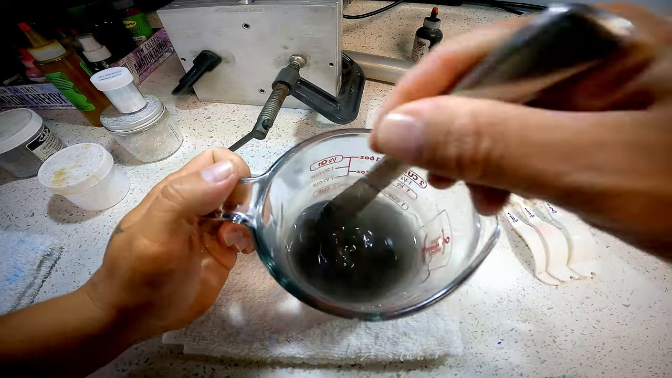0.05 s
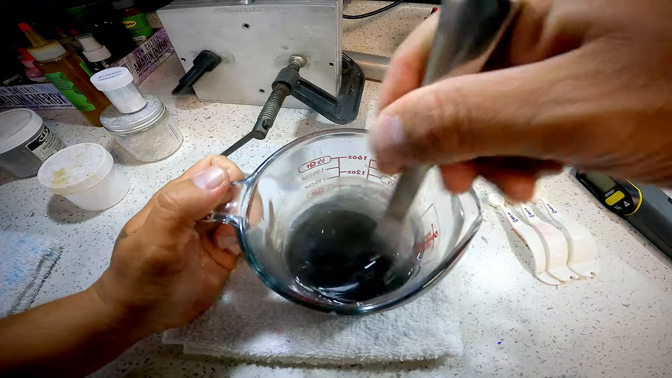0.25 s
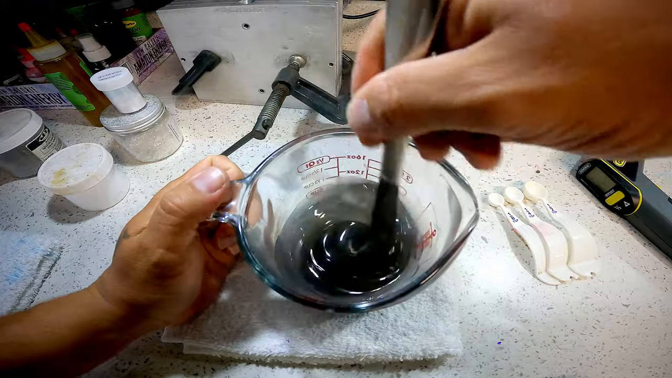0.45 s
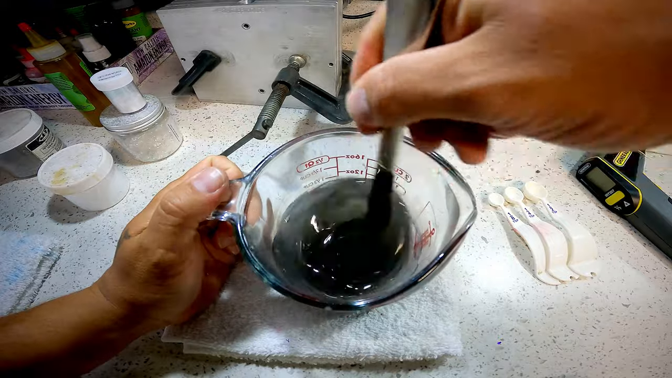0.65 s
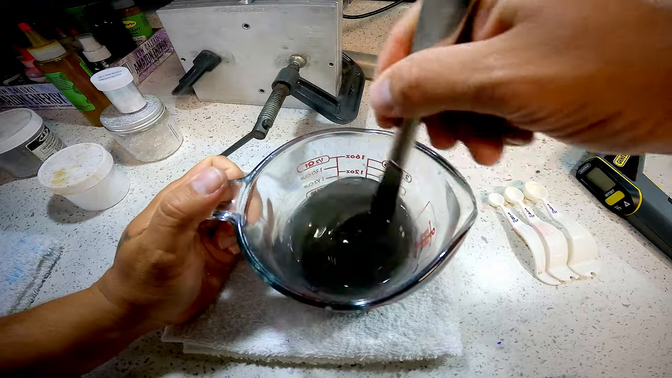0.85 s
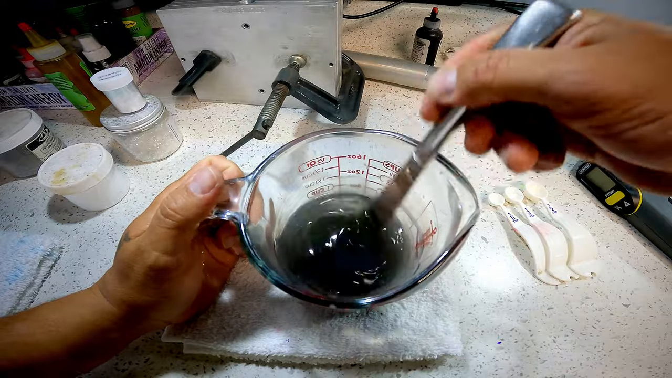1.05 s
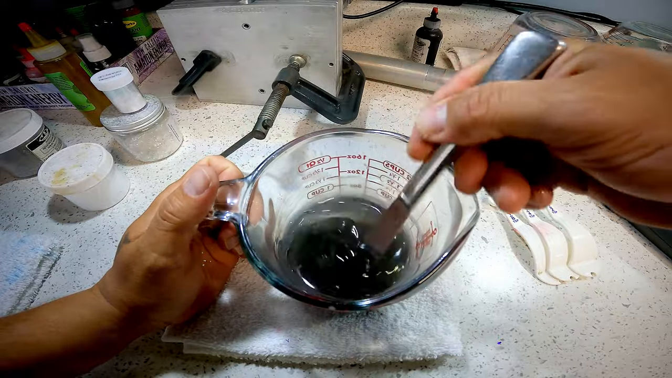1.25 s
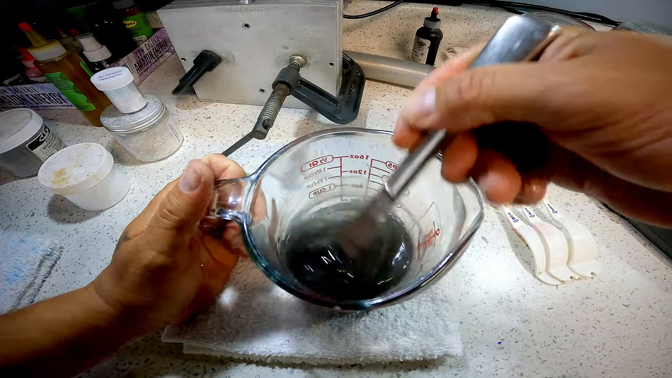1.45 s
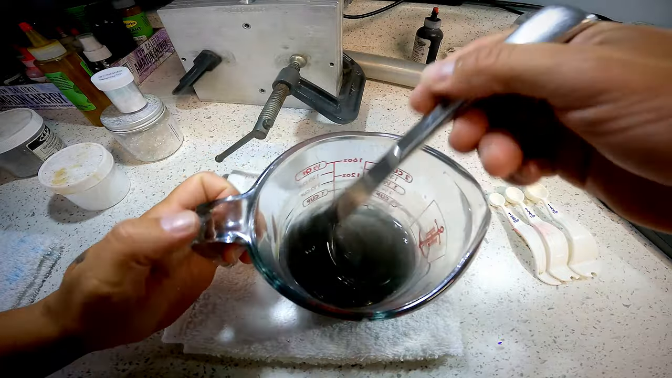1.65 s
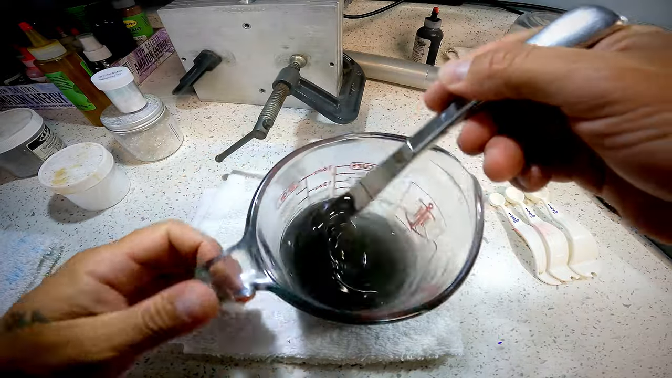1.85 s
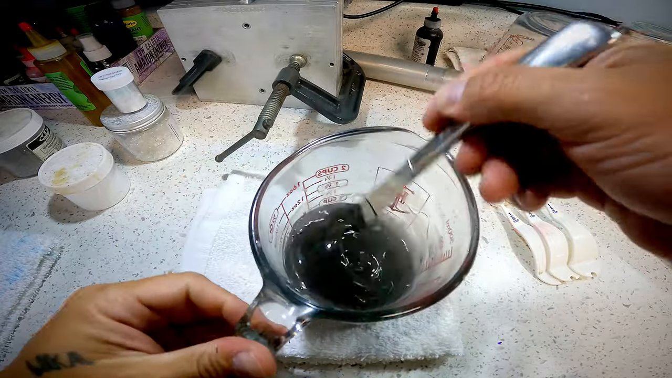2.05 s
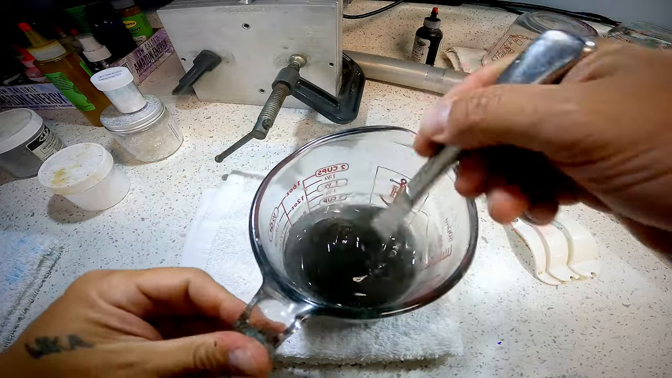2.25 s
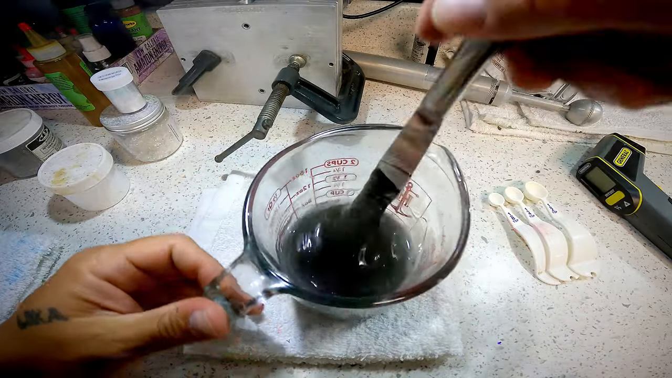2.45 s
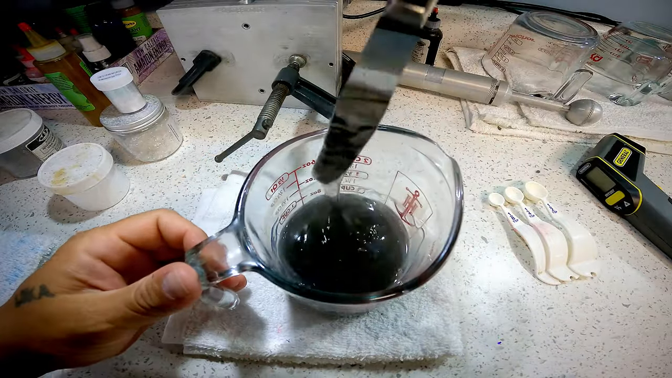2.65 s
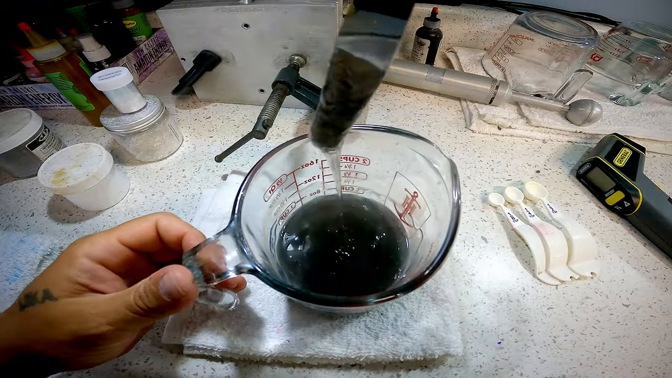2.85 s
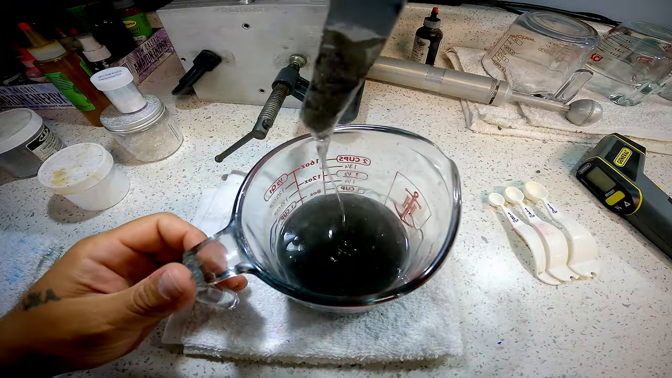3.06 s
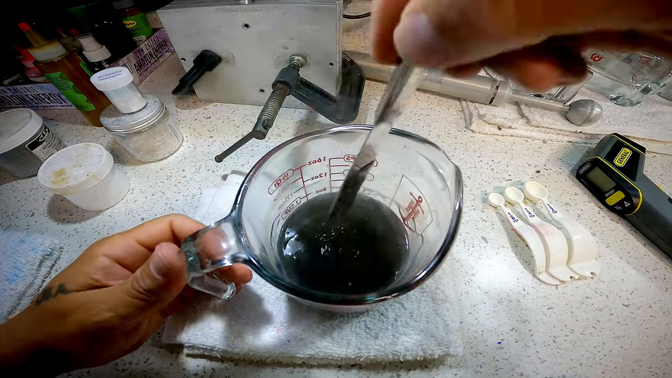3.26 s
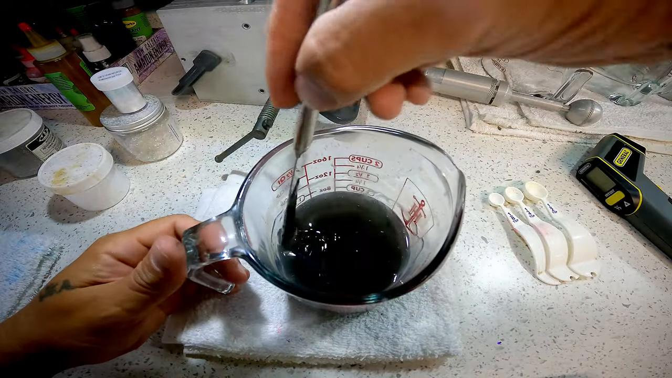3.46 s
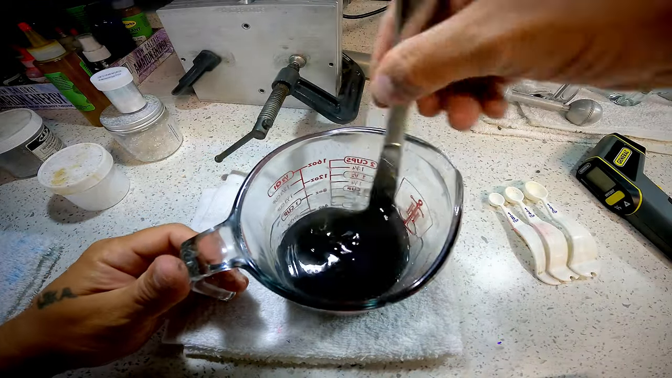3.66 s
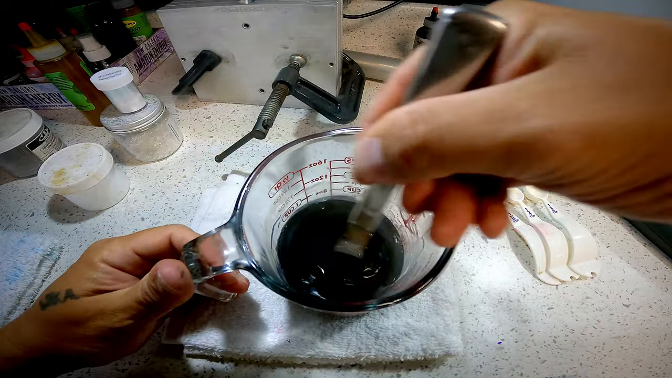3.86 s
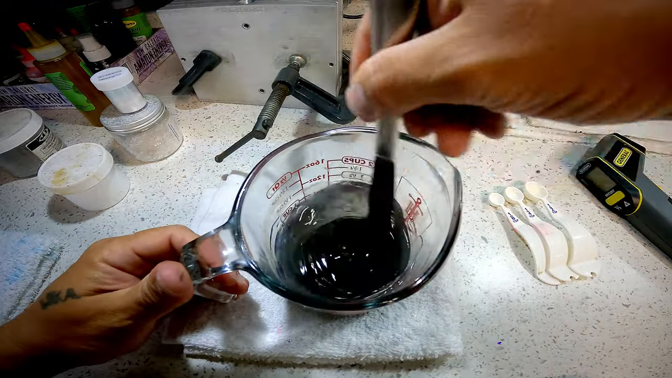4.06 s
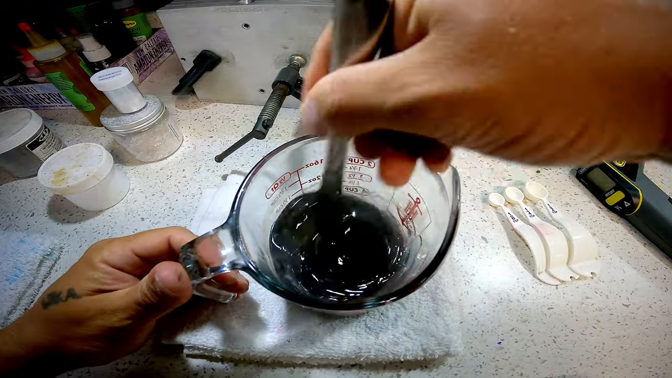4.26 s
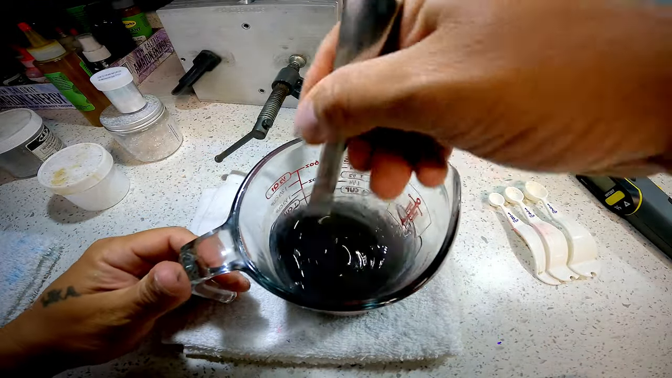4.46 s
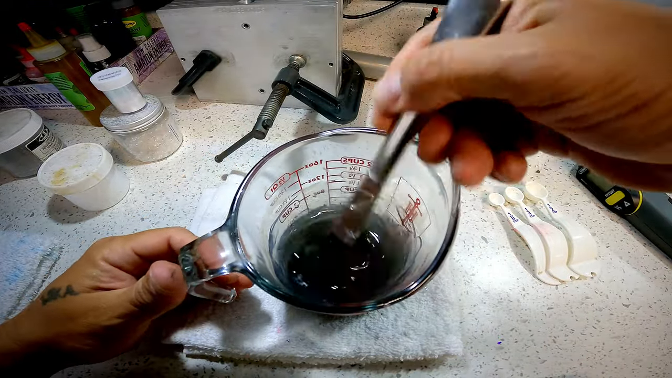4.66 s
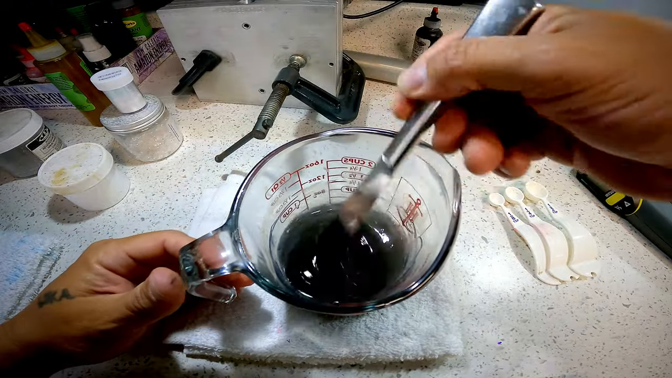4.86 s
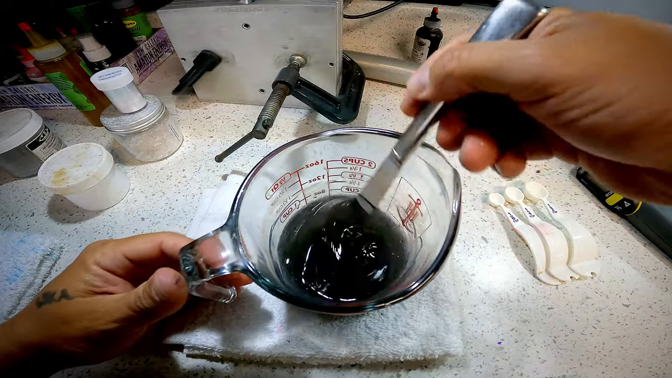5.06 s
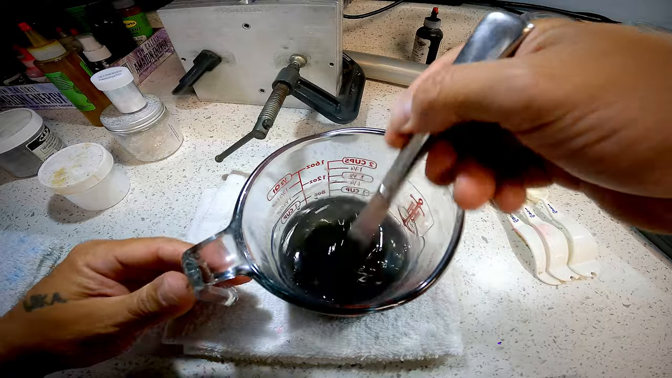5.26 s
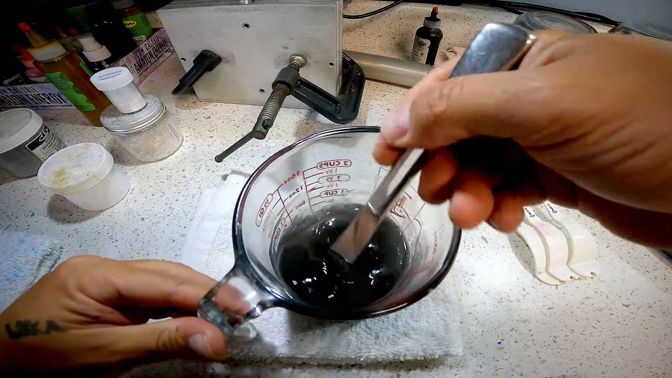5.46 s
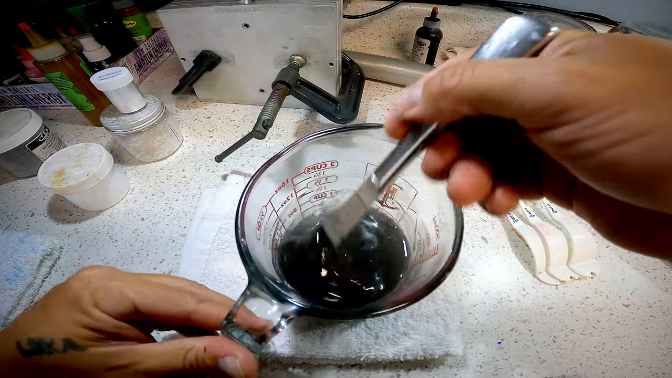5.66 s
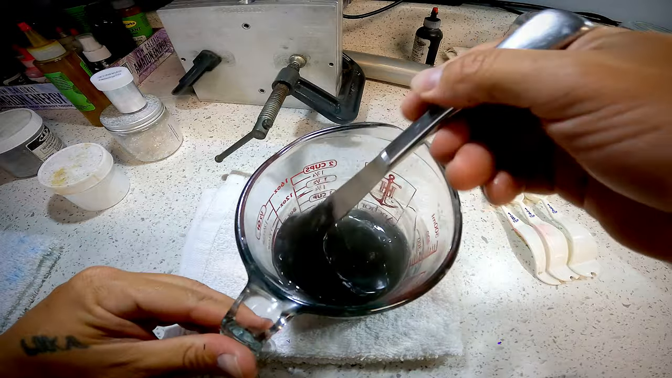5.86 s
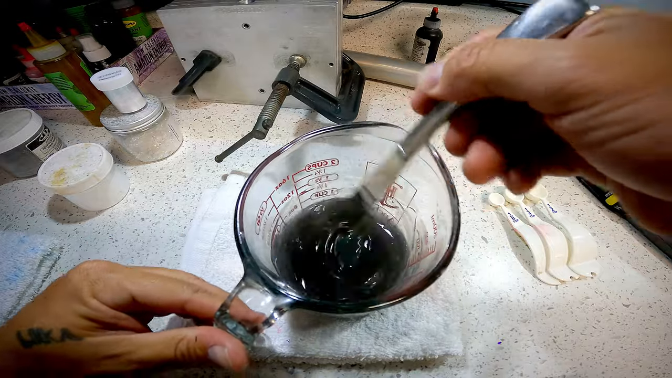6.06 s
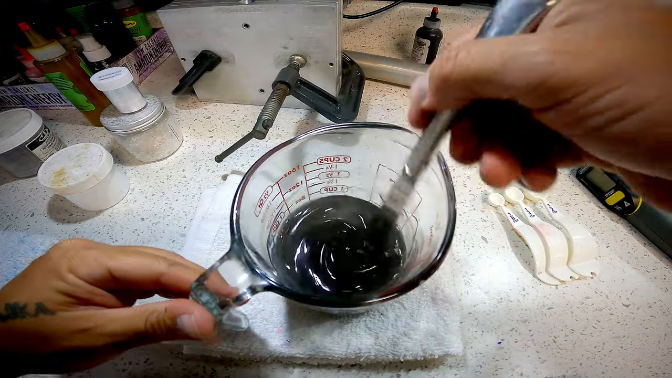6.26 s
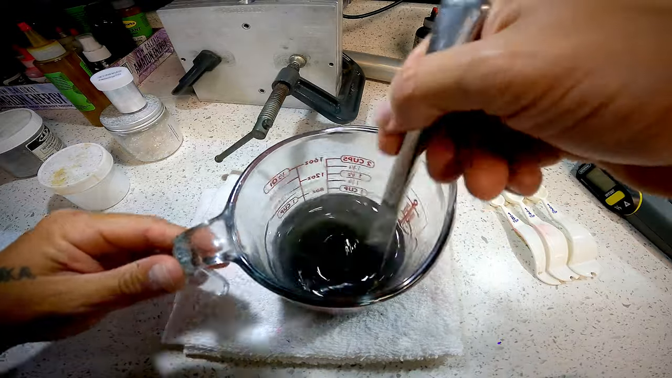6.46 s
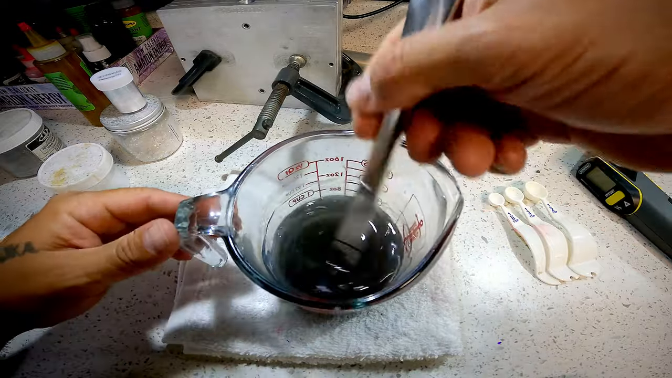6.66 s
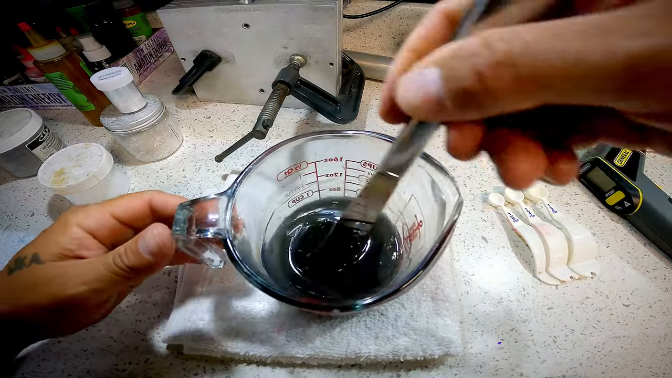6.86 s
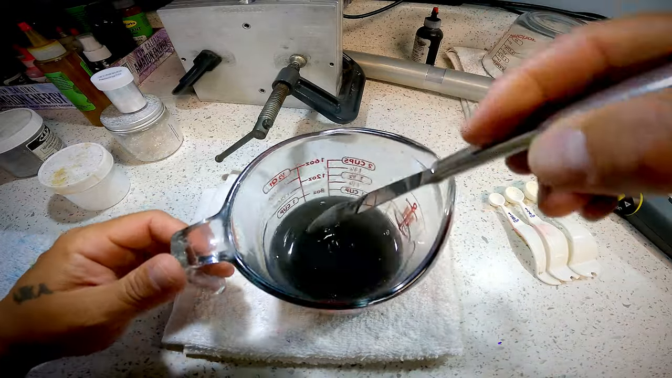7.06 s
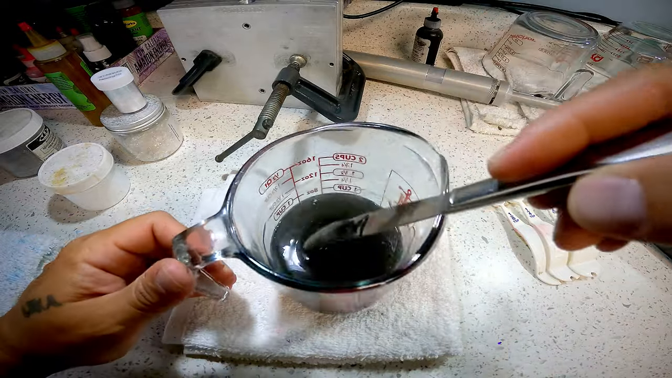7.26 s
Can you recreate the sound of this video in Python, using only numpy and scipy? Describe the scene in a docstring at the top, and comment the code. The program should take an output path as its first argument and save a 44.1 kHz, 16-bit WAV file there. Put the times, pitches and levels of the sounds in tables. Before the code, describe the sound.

A metal blade scrapes, then taps rapidly inside a glass cup of thick dark liquid, with wet swishes, low bench thumps and faint ventilation hum.

```python
"""A ventilation hum fills a small room; a bird whistles far outside from start to end.
A cup of hot liquid rumbles on its towel, bubbles open, and a steel blade rubs over the glass bottom (0.4-0.8 s).
The blade then beats about six times a second, to 2.3 s: wall knocks that rock the bench, light taps, swishes.
It rubs again from 3.6 s, beats from 4.8 to 6.7 s, and the cup rumbles once more at 7.1 s.
Contacts drive decaying modes, the liquid is made of tiny ringing bursts, the air is shaped noise plus tones."""
import sys
import numpy as np
from scipy import signal
from scipy.fft import rfft, irfft, next_fast_len
from scipy.io import wavfile

SR = 44100
rng = np.random.default_rng(int(sys.argv[2]) if len(sys.argv) > 2 else 0)


def log_audio(samples):
    """Write samples as a 16-bit WAV file to the path given in sys.argv[1]."""
    # one column per channel
    frames = np.atleast_2d(samples).T
    # limit to full scale, then quantise
    limited = np.clip(frames, -1, 1)
    pcm = np.round(limited * 32767).astype(np.int16)
    wavfile.write(sys.argv[1], SR, pcm)


N = 322371

# All levels are relative: source offsets, colours and the microphone ports act on them later.

# ventilation tones: (frequency [Hz], level [dB])
HUM_TONES = [(59.2, -69.5), (145.3, -71.5), (274.5, -80.5), (339, -72.5), (414.6, -65.5), (473.8, -75)]
# ventilation noise spectrum: (frequency [Hz], density [dB])
AIR_SPECTRUM = [(25, -19.5), (60, -3), (120, 1), (250, -5), (420, -5.5), (540, -18.5), (800, -28),
                (1150, -15.5), (1600, -21.5), (2200, -24.5), (4000, -32), (7000, -35), (10000, -54),
                (14000, -72.5)]

# rising bird calls: (time [s], start pitch [Hz], level [dB])
CHIRPS = [(0.0, 2750, -63.5), (2.53, 2673, -63), (2.913, 2623, -63.5), (3.058, 2400, -50.5),
          (4.87, 2520, -66), (5.996, 2460, -51), (6.8, 2480, -61.5), (7.089, 2296, -65)]
CHIRP_S, CHIRP_END_OVER_START = 0.13, 1.145
# short falling bird notes: time [s]
PIP_TIMES_S = [2.955, 3.09, 3.356, 7.2]
PIP_S, PIP_START_HZ, PIP_END_OVER_START, PIP_DB = 0.0253, 5560, .88, -71
# one low, level whistle: (time [s], length [s], pitch [Hz], level [dB])
LOW_WHISTLE = (2.5, 0.05, 1489.5, -59.5)

# hands shifting the cup on the towel: (time [s], length [s], level [dB], right minus left [dB])
SHIFTS = [(0.15, 0.93, -59, 8), (1.7, 0.22, -68, 0), (3.6, 0.3, -68, 7), (4.2, 0.847, -63, 10.5),
          (7.12, 0.2, -61, 18.5)]

# bench top modes: (frequency [Hz], level [dB], t60 [s])
BENCH_MODES = [(43, -14, 0.73), (52.2, 0.5, 0.4), (57.46, -16, 0.52), (88.5, -14, 0.34),
               (125.1, 5.5, 0.028), (190, 2, 0.023), (255, -11.5, 0.047), (330, -15.5, 0.0058)]
# bench push relative to the level of its contact
KNOCK_THUMP_DB, TAP_THUMP_DB, SCRAPE_THUMP_DB, BUBBLE_THUMP_DB = -7.5, -19, -25, -30

# blade cutting through the liquid, duller where deep: (time [s], level [dB], brightness [dB])
SWISHES = [(0.189, -43, -1), (0.641, -35.5, -4), (0.905, -50, -3), (1.546, -43.5, -2), (1.882, -45, 1),
           (2.053, -48, 2.5), (2.228, -50, 1), (3.599, -47, 8), (3.758, -38.5, -6.5), (5.721, -45.5, 4),
           (5.89, -46.5, 3)]
SWISH_S = .043
# large bubbles opening behind the blade: (time [s], level [dB])
BUBBLES = [(0.173, -24.5), (0.2133, -28), (0.6661, -24), (3.6202, -22), (3.7816, -20.5), (3.8282, -24),
           (5.7493, -32)]
BUBBLE_MEAN_HZ, BUBBLE_SPREAD_RATIO = 2400, 0.031
# strength of a tiny bubble by its pitch: (frequency [Hz], gain [dB])
SPRAY_GAINS = [(400, -30), (1000, 19), (2000, -9), (3000, 8), (5000, -4.5), (8000, -13), (10000, -27),
               (15000, -22.5)]

# steady sliding, one curve a passage: (time [s], level of the rub [dB], level of the treble [dB])
SLIDING_CURVES = [
    [(0.37, -56, -72), (0.43, -47.5, -54), (0.538, -49, -72), (0.574, -50.5, -79), (0.7, -44, -69),
     (0.78, -67, -81)],
    [(3.58, -62.5, -67), (3.64, -50, -61), (3.708, -49, -50), (3.78, -45, -56), (3.834, -50, -67),
     (4.018, -56, -48), (4.244, -50.5, -55), (4.41, -49.5, -58), (4.488, -50.5, -61.5), (4.608, -42.5, -55),
     (4.66, -79, -76)],
]
# tip juddering over the bottom:
# (time [s], length [s], level [dB], mean slip rate [Hz], middle range over low range [dB])
SCRAPES = [(0.381, 0.032, -40, 990, -3.5), (0.49, 0.028, -44, 973, -21), (0.526, 0.045, -31, 927, -17),
           (0.708, 0.048, -37.5, 988, -36), (0.919, 0.032, -40, 1035, -4), (3.823, 0.048, -46, 948, -7),
           (4.153, 0.037, -26.5, 983, -2.5), (4.257, 0.051, -35, 1007, -6), (4.302, 0.055, -36.5, 964, -14),
           (4.382, 0.057, -27, 994, -10), (4.609, 0.027, -33.5, 1031, -11.5)]
SCRAPE_TREBLE_DB = -55   # hardly depends on pressure
# sliding tip catching on grit: (time [s], level [dB])
CATCHES = [(0.173, -31), (0.214, -34.5), (0.385, -26.5), (0.561, -28), (0.725, -30), (3.945, -36.5),
           (3.968, -32), (3.995, -32.5), (4.14, -32), (4.289, -25), (4.461, -30.5)]

# firm wall knocks, bright if hard, dull if cushioned: (time [s], level [dB], brightness [dB])
KNOCKS = [(0.8656, -32.5, -2), (1.2922, -34, 2), (1.4552, -32, 1.5), (1.6209, -32, .5),
          (1.7477, -30.5, -0.5), (1.7986, -36.5, 0.5), (1.955, -31, 1.5), (2.1318, -31, 1.5),
          (2.298, -30.5, 1), (4.5173, -40.5, -10), (4.8213, -42, -3), (4.9694, -37, .5), (5.6238, -32, -1),
          (5.7912, -32, -1.5), (5.968, -31, 0), (6.1475, -30.5, -0.5), (6.4927, -32, -2), (6.6536, -33, -4)]
# light taps of the blade's edge: (time [s], level [dB], brightness [dB])
TAPS = [(0.3541, -44, 5), (0.628, -45.5, -8), (1.078, -50.5, -2), (1.5043, -47.5, 2), (1.542, -43.5, 2),
        (1.7247, -33, 4.5), (1.881, -37, 4), (2.0403, -44, 3), (2.2116, -39.5, 1.5), (3.4778, -43, 6.5),
        (4.021, -47, 2), (4.573, -49, -8.5), (5.026, -37.5, -.5), (5.1976, -43, 0), (5.3506, -45.5, 3),
        (5.4218, -39.5, 5), (5.5033, -35, 5), (5.6746, -35.5, 2.5), (5.8552, -37, 1), (6.3621, -45, 8.5)]
# blows that let the cup ring freely: (time [s], level [dB], brightness [dB], bench thump [dB])
CLINKS = [(1.0895, -27, 6, -35.5), (1.755, -26.5, 1, -42.5)]
# modes of blade and glass: (nominal frequency [Hz], free t60 [s],
# level in a knock [dB], in a tap [dB], in a clink [dB], in a scrape [dB])
CUP_MODES = [ (824, 0.018, -7, -19, -22, -9), (1007, 0.018, -11, -8.5, -4, 2.5),
             (1155, 0.011, 5.5, -19.5, 0, 3.5), (1294, 0.3, -16.5, -23.5, -18.5, -29.5),
             (1357, 0.14, -15, -23, -15.5, -22), (1382, 0.02, 5.5, -12, -4.5, 5.5),
             (1543, 0.03, -27.5, -6.5, -22, -1.5), (1564, 0.19, -47.5, -33.5, -21, -44),
             (1681, .4, -58, -54.5, -24, -37.5), (2080, 0.012, -4, -8.5, -29, -14.5),
             (2400, 0.022, -5.5, -12, -1.5, -5), (2653, 0.012, 4, 1.5, -5.5, -6.5),
             (3003, 0.025, -11.5, -0.5, -12, -20.5), (3107, 0.025, -13, -0.5, -48, -19.5),
             (3290, 0.017, -6.5, -8, -21.5, -5.5), (3470, 0.033, -6, -6, -33.5, -28.5),
             (3470, 0.15, -18, -19.5, -30.5, -38.5), (3550, 0.024, -3, -7, 0, -50.5),
             (4448, 0.03, -17, -12.5, -14, -19.5), (4750, 0.37, -36, -34.5, -26.5, -41.5),
             (4805, 0.01472, -6.5, -9, -3, -19), (5140, 0.044, -18, -14, 7.5, -33),
             (5200, 0.33, -38, -32.5, -20.5, -35.5), (5670, 0.013, -12.5, -2.5, -18, -25),
             (6385, 0.017, 0.5, -4, 13, -11), (6300, .3, -40, -36.5, -18.5, -40),
             (6530, 0.51, -51, -41, -23, -38.5), (6700, .3, -36, -35.5, -20, -39),
             (7170, 0.02, 4.5, 4, -0.5, -22), (7410, 0.32, -28.5, -23.5, -27.5, -14),
             (8120, 0.027, -20.5, -3, -12.5, -20), (8430, 0.21, -28, -26.5, -31, -34),
             (8610, 0.032, -18, -8.5, -32.5, -23), (10900, .05, -42, -23, -15.5, -30),
             (11550, 0.022, -10, -21.5, -35.5, -23)]
# noise spectrum of a contact's crack: (frequency [Hz], density [dB])
CRACK_SPECTRUM = [(200, -11), (550, -8), (1100, -19.5), (3000, 1), (8000, 2.5), (10000, -10),
                  (13000, -10.5), (16000, -43.5)]
# many weak overtones of the glass: (frequency [Hz], density [dB])
SHIMMER_SPECTRUM = [(700, -12.5), (1400, 5.5), (2100, -11.5), (3500, -5), (5200, -8.5), (7200, -1.5),
                    (8700, -9), (10000, -19.5), (12000, -18), (15000, -43)]

# boundaries of the low, middle and treble ranges: frequency [Hz]
RANGE_EDGES_HZ = [550, 2000, 4500, 16000]
# colour of each contact: (low [dB], middle [dB], treble [dB])
KNOCK_COLOUR_DB = (0, .5, -0.13)
TAP_COLOUR_DB = (-0.67, 0.92, 0.12)
CLINK_COLOUR_DB = (-.5, 0.99, -0.39)
CATCH_COLOUR_DB = (0, 0, -6.5)
SWISH_COLOUR_DB = (-12.5, 0, -4.5)

# level difference between the ports: (frequency [Hz], left minus right [dB])
PORT_BALANCE = [(60, -1), (200, -5), (380, -2.5), (700, -1.5), (1300, -0.8), (2400, -3), (4400, -1.5),
                (8000, 0.5), (15000, -2.5)]
# phase difference between the ports: (frequency [Hz], lead of the left [rad])
PORT_PHASE = [(0, 0), (780, -0.24), (2330, -0.46), (2670, -1.1), (2930, -0.37), (3360, -0.99),
              (4650, -0.59), (10200, -0.22), (12100, 0.93), (15300, -0.1), (15600, -0.6), (16400, 0.1)]
CUTOFF_HZ = 16400


def from_db(db):
    """Decibels to gain."""
    return 10 ** (np.asarray(db) / 20)


def rms_one(x):
    """Scale to an rms of 1."""
    return x / np.sqrt(np.mean(x ** 2) + 1e-20)


def seconds(length_s):
    """Time axis of the given length."""
    return np.arange(int(length_s * SR)) / SR


def add(out, start_s, sound):
    """Mix a sound in at its start time."""
    i = max(int(start_s * SR), 0)
    out[i:i + len(sound)] += sound[:N - i]


def butter(x, hz, kind, order=2):
    """Causal Butterworth filter."""
    return signal.sosfilt(signal.butter(order, hz, kind, fs=SR, output="sos"), x)


def coloured(x, spectrum):
    """Shape noise by (Hz, dB) points, joined along log frequency, to an rms of 1."""
    hz, db = np.transpose(spectrum)
    size = next_fast_len(x.shape[-1])
    bins_hz = np.maximum(np.fft.rfftfreq(size, 1 / SR), 1)
    gain = from_db(np.interp(np.log(bins_hz), np.log(hz), db))
    return rms_one(irfft(rfft(x, size) * gain, size)[..., :x.shape[-1]])


def dying(t, t60_s):
    """Exponential decay, 60 dB in t60."""
    return np.exp(-np.log(1000) * t / t60_s)


def wander(size, per_s):
    """Slow random motion with a spread near 1."""
    place = np.arange(size) * per_s / SR
    return np.interp(place, np.arange(N // 10), rng.standard_normal(N // 10))


def stroke(t, length_s, fade):
    """Pressure swells and lets go over one stroke; fade is a fraction of its length."""
    rise = np.clip(t / (fade * length_s), 0, 1)
    fall = np.clip((length_s - t) / (fade * length_s) + 0.57, 0, 1)
    return rise * fall


def grains(size, per_s, spread_db):
    """Random tiny impacts of very unequal strength."""
    strength = from_db(spread_db * np.minimum(rng.exponential(1, size), 4))
    return (rng.random(size) < per_s / SR) * strength * rng.choice([-1, 1], size)


def tilted(db, bright_db, colour_db):
    """Levels of the three ranges: brightness lifts the treble as much as it lowers the low range."""
    return db + np.array(colour_db) + bright_db * np.array([-1, 0, 1])


def voiced(sound, levels_db, window_s):
    """Place and firmness of a contact set the rms of its three ranges over the opening window."""
    out = 0
    for k, level_db in enumerate(levels_db):
        band = butter(sound, RANGE_EDGES_HZ[k:k + 2], "band", order=3)
        gain = from_db(level_db) / np.sqrt(np.mean(band[:int(window_s * SR)] ** 2) + 1e-20)
        out = out + gain * band * (-1) ** k
    return out


def resonate(drive, gain, r, w):
    """Two-pole resonator: pole radius r, angle w [rad per sample]."""
    return signal.lfilter([0, gain * np.sin(w)], [1, -2 * r * np.cos(w), r * r], drive + 1e-18)


def room(x, t60_s, dull_hz):
    """Diffuse reflections as decaying noise, independent at each microphone."""
    t = seconds(.6)
    tail = rng.standard_normal((2, len(t))) * dying(t, t60_s) * np.clip(t / .006, 0, 1)
    tail = butter(tail / np.sqrt(np.sum(tail ** 2) / 2), dull_hz, "low", order=1)
    return signal.fftconvolve(x[None], tail, axes=1)[:, :N]


def ports(x):
    """Shading and delay set level and phase differences between two microphone ports."""
    size = next_fast_len(N + SR // 10)
    log_hz = np.log(np.maximum(np.fft.rfftfreq(size, 1 / SR), 1))
    balance_hz, balance_db = np.transpose(PORT_BALANCE)
    phase_hz, lead_rad = np.transpose(PORT_PHASE)
    db = np.interp(log_hz, np.log(balance_hz), balance_db)
    lead = np.interp(log_hz, np.log(phase_hz), lead_rad)
    left = from_db(db / 2) * np.exp(.5j * lead)
    return irfft(rfft(x, size) * np.array([left, 1 / left]), size)[:, :N]


def ventilation(air_db=-60, side_db=-11):
    """Airflow noise, slightly wide, under tones that waver in phase."""
    t = np.arange(N) / SR
    mid, side = coloured(rng.standard_normal((2, N)), AIR_SPECTRUM)
    tones = 0
    for hz, db in HUM_TONES:
        phase = 2 * np.pi * hz * t + 0.15 * wander(N, 2.2)
        tones = tones + np.sqrt(2) * from_db(db) * np.sin(phase)
    rush = mid + from_db(side_db) * side * np.array([[1], [-1]])
    return tones + from_db(air_db) * rush


def whistle(length_s, start_hz, end_over_start, db, warble=0.022):
    """One slightly hoarse note that swells and fades while its glide levels off."""
    t = seconds(length_s)
    glide = 1 + (end_over_start - 1) * np.sin(np.pi / 2 * t / length_s)
    hz = start_hz * glide * (1 + warble * wander(len(t), 252))
    return from_db(db) * 2 * np.sin(np.pi * t / length_s) * np.sin(2 * np.pi * np.cumsum(hz) / SR)


def bird(level_db=-1, echo_t60_s=0.53):
    """Distant whistles, smeared by many reflections on their way in."""
    out = np.zeros(N)
    for s, hz, db in CHIRPS:
        add(out, s, whistle(CHIRP_S, hz, CHIRP_END_OVER_START, db))
    for s in PIP_TIMES_S:
        add(out, s, whistle(PIP_S, PIP_START_HZ, PIP_END_OVER_START, PIP_DB))
    s, length_s, hz, db = LOW_WHISTLE
    add(out, s, whistle(length_s, hz, 1, db))
    return from_db(level_db) * room(out, echo_t60_s, dull_hz=9000)


def handling(low_hz=85, high_hz=170):
    """The cup creeps on the towel: band-limited noise of uneven level."""
    out = np.zeros((2, N))
    for s, length_s, db, right_db in SHIFTS:
        t = seconds(length_s)
        rumble = rms_one(butter(rng.standard_normal(len(t)), [low_hz, high_hz], "band"))
        rumble = from_db(db + 2 * wander(len(t), 26)) * rumble * stroke(t, length_s, fade=0.21)
        for channel, side in zip(out, (-1, 1)):
            add(channel, s, from_db(side * right_db / 2) * rumble)
    return out


def bench(lag_s=0.0029, level_db=8, lowest_hz=28):
    """Pushes of the blade and bubbles pass through the towel and set the bench modes swaying."""
    out, t = np.zeros(N), seconds(0.63)
    pushes = [(s, db + KNOCK_THUMP_DB) for s, db, _ in KNOCKS]
    pushes += [(s, db + TAP_THUMP_DB) for s, db, _ in TAPS]
    pushes += [(s, thump_db) for s, _, _, thump_db in CLINKS]
    pushes += [(s, db + SCRAPE_THUMP_DB) for s, _, db, _, _ in SCRAPES]
    pushes += [(s, db + BUBBLE_THUMP_DB) for s, db in BUBBLES]
    attack = 1 - np.exp(-t / 0.0038)
    for s, thump_db in pushes:
        sway = 0
        for hz, db, t60_s in BENCH_MODES:
            strength = from_db(db + 1.5 * rng.standard_normal())
            sway = sway + strength * np.sin(2 * np.pi * hz * t) * dying(t, t60_s)
        add(out, s + lag_s, from_db(thump_db + level_db) * sway * attack)
    return butter(out, lowest_hz, "high")


def fizz(flow, per_s, spread_db, t60_cycles):
    """Tiny bubbles burst at random, each ringing for some cycles at one of many pitches."""
    bursts = grains(len(flow), per_s, spread_db) * flow
    pitches_hz = np.geomspace(900, 13000, 36)
    dealt = rng.integers(0, len(pitches_hz), len(flow))
    spray_hz, spray_db = np.transpose(SPRAY_GAINS)
    out = 0
    for k, hz in enumerate(pitches_hz):
        gain = hz * from_db(np.interp(np.log(hz), np.log(spray_hz), spray_db))
        out = out + resonate(bursts * (dealt == k), gain, dying(hz / SR, t60_cycles), 2 * np.pi * hz / SR)
    return rms_one(out)


def rubbed(force, patchy_db=8.5, shifts_per_s=60, detune=0.041, lowest_hz=740, pressed_t60_s=0.054):
    """Friction drives the modes; as the contact point travels, each swells and fades by itself."""
    out = 0
    for k, (hz, t60_s, *_, scrape_db) in enumerate(CUP_MODES):
        r = dying(1 / SR, min(t60_s, pressed_t60_s))   # the pressed blade damps the glass
        w = 2 * np.pi * hz * (1 + detune * rng.uniform(-1.3, 1)) / SR
        drive = force * from_db(scrape_db + patchy_db * wander(len(force), shifts_per_s))
        out = out + (-1) ** k * resonate(drive, 1, r, w)
    return rms_one(butter(out, lowest_hz, "high", order=4))


def swishes(level_db=-2):
    """Fizzing behind the blade, mixed with fine rubbing."""
    out = np.zeros(N)
    for s, db, bright_db in SWISHES:
        t = seconds(SWISH_S + .04)
        flow = stroke(t, SWISH_S, fade=0.092)
        spray = fizz(flow, per_s=6400, spread_db=6.0, t60_cycles=40)
        rub = rubbed(flow * grains(len(t), 2200, spread_db=4.5))
        levels_db = tilted(db, bright_db, SWISH_COLOUR_DB)
        add(out, s, from_db(level_db) * voiced(spray + from_db(-1.0) * rub, levels_db, SWISH_S))
    return out


def bubbles(level_db=-1):
    """Single larger bubbles ring down, wobbling in pitch as they open."""
    out, t = np.zeros(N), seconds(.05)
    envelope = dying(t, 0.04) * (1 - np.exp(-t / 0.00024))
    for s, db in BUBBLES:
        hz = BUBBLE_MEAN_HZ * (1 + BUBBLE_SPREAD_RATIO * rng.standard_normal())
        turns = np.cumsum(hz * (1 + 0.041 * wander(len(t), 800))) / SR
        add(out, s, from_db(db + level_db) * np.sin(2 * np.pi * turns) * envelope)
    return out


def sliding(wet_db=-3, low_db=0, middle_db=-2, treble_db=2):
    """Fine grit and bubbles crackle under the blade on the bottom."""
    out = np.zeros(N)
    for rows in SLIDING_CURVES:
        s, rub_db, hiss_db = np.transpose(rows)
        levels_db = (rub_db + low_db, rub_db + middle_db, hiss_db + treble_db)
        t = seconds(s[-1] - s[0])
        jerks = from_db(3.2 * wander(len(t), 91.55))
        grit = rubbed(grains(len(t), 3000, spread_db=3.5) * jerks)
        wet = fizz(jerks, per_s=4100, spread_db=4.5, t60_cycles=39)
        sound = grit + from_db(wet_db) * wet
        for k, db in enumerate(levels_db):
            band = rms_one(butter(sound, RANGE_EDGES_HZ[k:k + 2], "band", order=3))
            level = from_db(np.interp(t + s[0], s, db))
            add(out, s[0], band * level * stroke(t, t[-1], fade=0.0111))
    return out


def scrapes(jitter=.04, grit_db=-4, squeal_db=-4, level_db=-0.5):
    """The tip sticks and slips near 1 kHz, driving the modes and a brief two-tone squeal over the grit."""
    out = np.zeros(N)
    for s, length_s, scrape_db, slip_hz, overtones_db in SCRAPES:
        levels_db = (scrape_db, scrape_db + overtones_db, SCRAPE_TREBLE_DB)
        t = seconds(length_s + .08)
        pressure = stroke(t, length_s, fade=0.19)
        turns = np.cumsum(slip_hz * (1 + jitter * wander(len(t), 200))) / SR
        slips = np.diff(np.floor(turns), prepend=0) * from_db(5.5 * wander(len(t), 400))
        force = slips + from_db(grit_db) * grains(len(t), 3000, spread_db=-0.5)
        tones = 0
        for ratio, db in [(1, -2), (1.62, -2)]:   # the blade's first and second bending mode
            strength = from_db(db + 5.4 * wander(len(t), 100))
            tones = tones + strength * np.sin(2 * np.pi * ratio * turns)
        squeal = rms_one(tones * pressure)
        pressure = pressure * from_db(1.8 * wander(len(t), 130.0))   # the hand presses unevenly
        sound = rubbed(force * pressure) + from_db(squeal_db) * squeal
        add(out, s, voiced(sound, levels_db, length_s))
    return from_db(level_db) * out


def catches(level_db=-13):
    """The tip snags and lets go: a short noise burst drives the modes, with a dry crack."""
    out, t = np.zeros(N), seconds(.06)
    for s, db in CATCHES:
        burst = rng.standard_normal(len(t)) * dying(t, 0.0042)
        snag = rubbed(burst, patchy_db=1.5) * dying(t, 0.1)
        crack = coloured(rng.standard_normal(len(t)), CRACK_SPECTRUM) * dying(t, 0.018)
        levels_db = db + level_db + np.array(CATCH_COLOUR_DB)
        add(out, s, voiced(snag + from_db(7.5) * crack, levels_db, 0.0053))
    return out


def blow(levels_db, column, spread_db, crack_db, crack_t60_s, contact_s, glass_db, shimmer_db):
    """One contact: modes of random strength ring with a brief crack and a faint shimmer."""
    t, modes = seconds(.4), np.array(CUP_MODES)
    hz, t60_s = modes[:, :1], modes[:, 1:2]
    is_glass = modes[:, 1] > .1
    chance_db = spread_db * np.clip(rng.standard_normal(len(modes)), -1.5, 1)
    strength = from_db(modes[:, column] + glass_db * is_glass + chance_db)
    # the grip detunes the short blade modes; the long glass modes keep their pitch
    hz = hz * (1 + 0.018 * rng.standard_normal(hz.shape) * ~is_glass[:, None])
    waves = np.sin(2 * np.pi * (hz * t + rng.random(hz.shape)))
    ring = strength @ (waves * dying(t, t60_s))
    crack = coloured(rng.standard_normal(len(t)), CRACK_SPECTRUM) * dying(t, crack_t60_s)
    shimmer = coloured(rng.standard_normal(len(t)), SHIMMER_SPECTRUM) * dying(t, 0.46)
    sound = ring + from_db(crack_db) * crack + from_db(shimmer_db) * shimmer
    attack = 1 - np.exp(-t / contact_s)
    return voiced(sound * attack, levels_db, .012)


def blows():
    """Knocks, taps and clinks on the cup; a shorter contact has a sharper attack."""
    out = np.zeros(N)
    knock, tap, clink = range(2, 5)   # columns of CUP_MODES
    for s, db, bright_db in KNOCKS:
        levels_db = tilted(db, bright_db, KNOCK_COLOUR_DB)
        add(out, s, blow(levels_db, knock, spread_db=4.5, crack_db=3.0, crack_t60_s=0.019,
                         contact_s=0.001, glass_db=-5.5, shimmer_db=-30.5))
    for s, db, bright_db in TAPS:
        levels_db = tilted(db, bright_db, TAP_COLOUR_DB)
        add(out, s, blow(levels_db, tap, spread_db=6.5, crack_db=4.5, crack_t60_s=0.019,
                         contact_s=0.00047, glass_db=-8.5, shimmer_db=-31.5))
    for s, db, bright_db, _ in CLINKS:
        levels_db = tilted(db, bright_db, CLINK_COLOUR_DB)
        add(out, s, blow(levels_db, clink, spread_db=3.0, crack_db=14, crack_t60_s=0.0042,
                         contact_s=0.00034, glass_db=-1.5, shimmer_db=-22))
    return out


def scene(muffle_hz=11500, room_db=-15.5):
    """The cup stands close to the microphones, in a small, fairly dead room."""
    background = ventilation() + bird() + handling()
    # the liquid dulls what happens in it
    submerged = butter(swishes() + bubbles() + sliding() + scrapes(), muffle_hz, "low", order=4)
    cup = submerged + catches() + blows()
    direct = ports(bench() + cup)
    reflected = from_db(room_db) * room(cup, t60_s=0.2, dull_hz=6990)
    return background + direct + reflected


def record(dry):
    """The top of the treble is cut."""
    return signal.sosfilt(signal.ellip(10, .1, 80, CUTOFF_HZ, fs=SR, output="sos"), dry)


dry = scene()
out = record(dry)
log_audio(out)
```